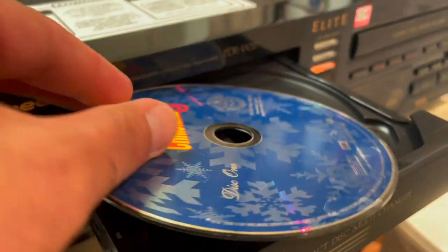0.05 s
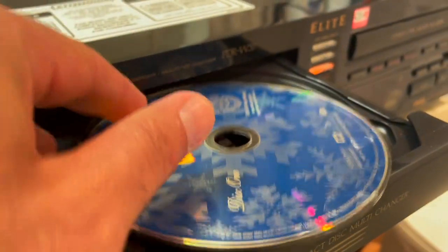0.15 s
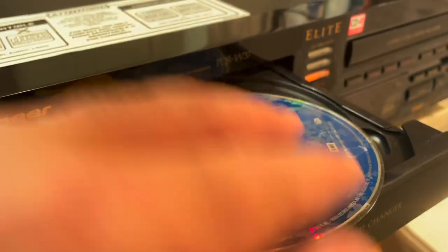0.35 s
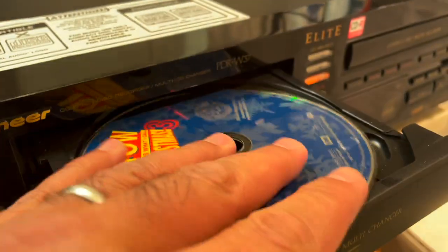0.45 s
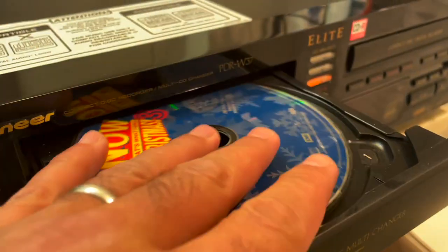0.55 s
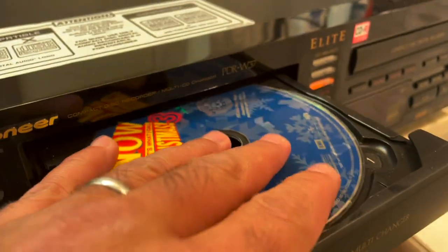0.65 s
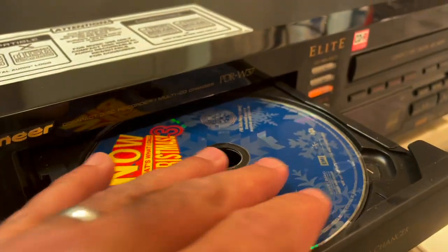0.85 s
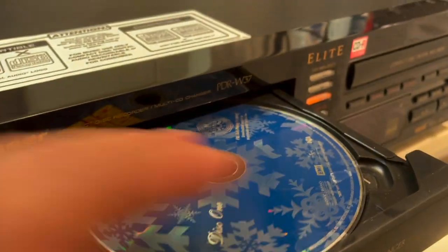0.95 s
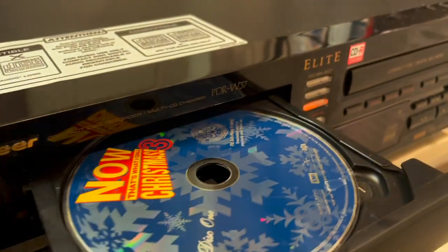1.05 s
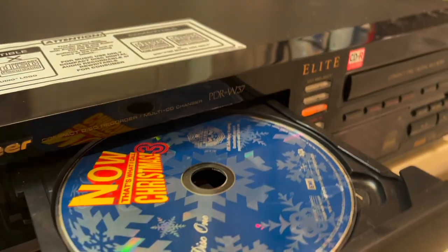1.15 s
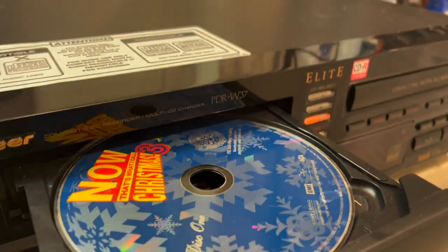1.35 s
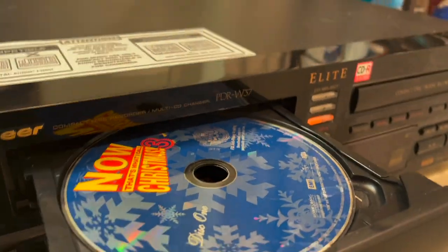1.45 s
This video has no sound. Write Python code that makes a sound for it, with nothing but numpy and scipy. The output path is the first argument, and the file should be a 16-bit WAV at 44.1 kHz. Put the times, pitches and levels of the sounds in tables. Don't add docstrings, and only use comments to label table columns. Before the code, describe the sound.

Hand seating a disc in an open plastic tray, close chattering clacks, then quiet low hum

```python
import sys
import numpy as np
from scipy import signal
from scipy.fft import rfft, irfft, next_fast_len
from scipy.io import wavfile
from scipy.ndimage import uniform_filter1d, map_coordinates

SR = 44100
rng = np.random.default_rng(int(sys.argv[2]) if len(sys.argv) > 2 else 0)


def output_pcm(signal):
    pcm = np.clip(np.atleast_2d(signal).T, -1, 1) * 32767
    wavfile.write(sys.argv[1], SR, np.round(pcm).astype(np.int16))


def gain_from_db(level_db):
    decades = np.asarray(level_db, float) / 20
    return 10 ** decades


N = 66150


def unit(x):
    return x / np.sqrt(np.mean(x ** 2) + 1e-20)


def along(points, hz):
    f, v = np.transpose(points)
    return np.interp(np.log(hz + 1), np.log(f + 1), v)


def wobble(rate):
    knots = rng.standard_normal(int(N * rate / SR) + 4)
    return map_coordinates(knots, [np.arange(N) * rate / SR])


def filtered(x, response):
    m = next_fast_len(N + SR // 2)
    return irfft(rfft(x, m) * response(np.fft.rfftfreq(m, 1 / SR)), m)[..., :N]


def body(colour, modes, wider, modes_db):
    def response(f):
        r = 1
        for centre, width, db in modes:
            damping = 1j * f * width * wider
            r = r + gain_from_db(db + modes_db) * damping / (centre * centre - f * f + damping)
        r = r * gain_from_db(along(colour, f))
        return r / np.sqrt(np.mean(np.abs(r) ** 2))
    return response


def contact_force():
    # t/s, peak/dB, tray ring/dB, edge sheen/dB, length/s
    rattles = [(0.2046, -22, -3, -12.5, 0.0083), (0.2548, -21, -1.5, -10.5, 0.011),
               (0.299, -22, -5.5, -10.5, .007), (0.443, -29, -1, -16.5, 0.0031),
               (0.478, -30, -1, -17, .005), (0.544, -22.5, -17, -5, 0.0052),
               (0.567, -21.5, -10.5, -9.5, 0.0079), (0.5877, -20, -8.5, -17, 0.0044),
               (0.597, -24.5, -5, -13, .011), (0.664, -22.5, -8, -12.5, 0.013),
               (0.757, -21.5, -4, -9, 0.0048)]
    # t/s, peak/dB, tray ring/dB, edge sheen/dB
    touches = [(0.033, -38.5, -5.5, -13), (0.0512, -34, -3, -14.5), (0.0917, -38, -2.5, -15.5),
               (.1095, -48.5, -5.5, -14.5), (0.1296, -45, -9.5, -16.5), (.1685, -47, -6.5, -9),
               (.177, -41.5, -2, -18.5), (0.223, -37.5, 6, -18.5), (0.2352, -33.5, 0, -5),
               (.293, -35.5, -3, -9.5), (0.332, -36, -0.5, -7), (0.377, -35.5, -3, -14.5),
               (0.402, -38.5, -3.5, -21), (.436, -40.5, -0.5, -18), (0.4692, -31.5, -3, -1.5),
               (0.5066, -30, -10.5, -10), (0.5241, -30, -12, -7), (0.618, -37, -9, -13),
               (0.652, -36, 4, -25), (0.686, -35, -5, -25.5), (.726, -53.5, -6, -10.5)]
    settling = [
        (1.4692, -65, 3, -19),
    ]
    # t/s, pressure/dB
    rubbing = [(0, -60.5), (.045, -54.5), (.08, -71.5), (.14, -56.5), (.195, -64), (.21, -49.5),
               (.32, -42.5), (.425, -64.5), (.465, -64.5), (.56, -42.5), (.61, -37.5), (.64, -53),
               (.72, -56), (.74, -50), (.8, -57.5), (.86, -68), (.915, -75), (.93, -100)]
    attack_s, release_s, touch_release_s = 0.0012, 0.0044, 0.0035
    crack_db, ring_db, sheen_db = -10, -6, -2
    lift_off_s = 0.755

    rows = [(*row, attack_s, release_s) for row in rattles]
    for s, db, ring, sheen in [*touches, *settling]:
        rows.append((s, db + 4, ring, sheen, 0, attack_s / 4, touch_release_s))
    u = np.arange(SR // 8) / SR
    slow = np.array([[1], [3.37], [1]])
    power = np.zeros((3, N + SR))
    for s, db, ring, sheen, length, attack, release in rows:
        shape = 1 - np.exp(-u / (attack * slow))
        shape = shape * np.exp(-np.clip(u - length, 0, None) / (release * slow))
        level = gain_from_db([[db + crack_db], [db + ring + ring_db], [db + sheen + sheen_db]])
        power[:, round((s - attack) * SR):][:, :len(u)] += (shape * level) ** 2

    t = np.arange(N) / SR
    patchy_db = 4 * wobble(59.96) * (t < lift_off_s)
    pressure_db = np.interp(t, *np.transpose(rubbing)) + patchy_db
    rub_gain = gain_from_db(pressure_db + np.array([[0], [3], [-15.5]]))
    return np.sqrt(power[:, :N] + rub_gain ** 2)


def disc_on_tray():
    # f/Hz, width/Hz, level/dB
    disc_modes = [(2500, 68, -1.5), (3068, 80, -1), (3480, 49, -1), (4330, 210, -5.5), (4680, 23, 0),
                  (5300, 83, -7), (5940, 75, -1.5)]
    tray_low_modes = [(620, 19, 0.5), (772, 37, -13.5), (901, 65, -13), (978, 23, -8)]
    tray_high_modes = [(1246, 51, -1.5), (1321, 70, -4.5), (1440, 31.9, -6), (1510, 8.6, 2), (1685, 35, -6),
                       (1972, 71, -7)]
    # f/Hz, level/dB
    crack_colour = [(500, -22.5), (1500, -13), (3000, 0.5), (5500, -4.5), (7000, -7), (9000, -30)]
    sheen_colour = [(5500, -25), (6600, 2.5), (10000, -1), (12500, -6), (13300, -14.5), (15700, -9)]
    low_colour = [(100, -9), (300, -0.5), (600, -3.5), (900, 0), (1150, 1.5), (1600, -35.5)]
    high_colour = [(600, -25), (1000, -14), (1300, -1), (2000, -4.5), (3500, -25.5)]
    # t/s, share of the high tone 0-1
    grip = [
        (0, 0.74),
        (.2, 0.55),
        (.3, 0.67),
        (.4, 0.7),
        (.5, 0.4),
        (.58, 0.65),
        (.67, .35),
        (.72, 0.52),
        (.752, 0.86),
    ]
    tray_wider, disc_wider = 0.92, 3.1
    snaps_per_s = 2000

    crack, ring, sheen = contact_force()
    high = np.clip(np.interp(np.arange(N) / SR, *np.transpose(grip)), 0, 1)
    dust = rng.standard_normal((2, N))
    snaps_db = 9.5 * (rng.random(N) < snaps_per_s / SR)
    grit = unit(dust * gain_from_db(2 * unit(wobble(1400)) + snaps_db))
    disc = filtered(grit * crack, body(crack_colour, disc_modes, disc_wider, 1))
    edge = filtered(grit * sheen, body(sheen_colour, [], 1, 0))
    tray_low = filtered(dust * ring * np.sqrt(1 - high), body(low_colour, tray_low_modes, tray_wider, 10))
    tray_high = filtered(dust * ring * np.sqrt(high), body(high_colour, tray_high_modes, tray_wider, 10))
    return disc + edge + tray_low + tray_high


def knocks():
    # t/s, peak/dB, f/Hz
    impacts = [(.2068, -32, 3300), (.2118, -30, 1950), (.2175, -34.5, 1500), (.2252, -29.5, 1150),
               (.2566, -26, 3100), (0.2617, -18.5, 1230), (.2645, -22.5, 3000), (.2742, -27, 1250),
               (.3005, -31, 2520), (.3035, -30.5, 1230), (0.4445, -31, 1950), (.4455, -31.5, 3000),
               (.4795, -31, 5200), (.4835, -32.5, 1300), (.5455, -31.5, 4260), (.5495, -28.5, 5200),
               (.5703, -23, 3290), (.5735, -31, 1450), (.5895, -24.5, 3560), (.5925, -32.5, 1700),
               (.6035, -29, 1300), (.6085, -33, 2000), (.6495, -35.5, 1950), (.6668, -28.5, 4590),
               (.6695, -18, 5600), (.6725, -26.5, 6300), (.6745, -25.5, 5000), (0.6768, -27.5, 5720),
               (0.681, -32.5, 4400), (.6865, -32.5, 1700), (.7572, -20, 4890), (.7605, -27.5, 2350),
               (.7632, -20.5, 4700), (.7665, -37.5, 1450)]
    # frequency ratio, level/dB
    partners = [(.87, -7), (1.16, -6.5), (1.43, -13.5)]
    # t/s, peak/dB, f/Hz,
    # t60/s
    lingering = [(.1, -46.5, 622, 0.16), (.21, -40.5, 990, 0.086), (.258, -29, 1201, 0.11),
                 (.26, -33, 873, 0.11), (.301, -31.5, 1176, .09), (.36, -43.5, 1335, 0.28),
                 (.4, -48, 600, .15), (0.479, -36.5, 1294, .1), (.485, -43.5, 611, 0.1),
                 (0.511, -40.5, 952, .2), (0.572, -34, 950, .1), (.596, -37.5, 838, 0.069),
                 (.658, -42, 1266, 0.072), (.666, -37, 753, .08), (.67, -38.5, 995, .08),
                 (.759, -34, 1277, .12), (0.761, -45.5, 1542, 0.27), (.77, -43.5, 380, .2),
                 (.764, -49.5, 4735, 0.22), (.766, -52, 5010, 0.18)]
    fall_cycles, rise_cycles, rise_s = 29, 0.6, 0.003

    out, u = np.zeros(N), np.arange(SR // 4) / SR
    for s, db, hz in impacts:
        ring = 0
        for ratio, less_db in [(1, 0), *partners]:
            mode_hz = hz * ratio
            decay_db = 60 * u * mode_hz / fall_cycles
            ring = ring + gain_from_db(db + 2 + less_db - decay_db) * np.sin(2 * np.pi * mode_hz * u)
        out[round(s * SR):][:len(u)] += ring * (1 - np.exp(-u * hz / rise_cycles))
    for s, db, hz, t60 in lingering:
        ring = gain_from_db(db - 60 * u / t60) * np.sin(2 * np.pi * hz * u)
        out[round(s * SR):][:len(u)] += ring * (1 - np.exp(-u / rise_s))
    return out


def thumps():
    # t/s, peak/dB, f/Hz
    pushes = [
        (0.208, -33, 70),
        (0.259, -31, 110),
        (0.445, -32.5, 90),
        (0.577, -32.5, 82),
        (.67, -36, 70),
        (.72, -53.5, 73),
        (0.641, -42, 220),
        (.6, -29, 345),
        (0.72, -38, 320),
        (.51, -40.5, 62),
    ]
    fall_cycles, rise_s = 20, 0.0087
    t, out = np.arange(N) / SR, np.zeros(N)
    for s, db, hz in pushes:
        u = np.clip(t - s, 0, None)
        swell = gain_from_db(db - 60 * u * hz / fall_cycles) * (1 - np.exp(-u / rise_s))
        out += swell * np.sin(2 * np.pi * hz * u)
    return out


def room(x):
    # f/Hz, t60/s
    decay = [(300, 1), (1400, 0.11), (4000, 0.06), (10000, 0.28)]
    hz, t, z = signal.stft(rng.standard_normal((2, SR // 2)), SR, nperseg=256)
    fading = z * gain_from_db(-60 * t / along(decay, hz)[:, None])
    tail = signal.istft(fading, SR, nperseg=256)[1]
    delayed = np.pad(x, (200, 0))[None]
    return signal.fftconvolve(delayed, tail / np.linalg.norm(tail[0]), axes=1)[:, :N]


def mains():
    # f/Hz, level/dB
    tones = [(119.5, -59), (254, -60)]
    t, out = np.arange(N) / SR, 0
    for hz, db in tones:
        out = out + gain_from_db(db + 4 + 1.9 * wobble(8.58)) * np.sin(2 * np.pi * (hz * t + rng.random()))
    return out


def air():
    # f/Hz, level/dB
    air_colour = [(30, -32.5), (65, -1), (200, -12.5), (420, -13.5), (1000, -22.5), (1850, -31),
                  (2500, -38), (3300, -43.5), (12000, -70), (16000, -100)]
    # f/Hz, width/Hz, level/dB
    hum_bands = [(56.7, 20, -58), (129, 6.7, -68.5), (243.4, 3, -61.5), (410, 33, -65.5), (880, 40, -76.5),
                 (1360, 150, -79.5), (2310, 230, -77)]
    # f/Hz, correlation
    likeness = [(60, 0.9), (240, 0.85), (950, 0.44), (3770, 0.52), (15000, 0.01)]

    def mid_side(hz):
        level = gain_from_db(-48 - 22 + along(air_colour, hz))
        for centre, width, db in hum_bands:
            level = level + gain_from_db(db) / np.sqrt(width) / (1 + ((hz - centre) / width * 2) ** 2)
        turn = np.arccos(np.clip(along(likeness, hz), -1, 1)) / 2
        return level * np.sqrt(SR / 2) * [np.cos(turn), np.sin(turn)]

    mid, side = filtered(rng.standard_normal((2, N)), mid_side) * gain_from_db(0.81 * wobble(4.1))
    return np.array([mid + side, mid - side])


def top_band_spells(x):
    # from t/s, to t/s
    spells = [(.056, .112), (.2025, .207), (.2345, .2365), (.252, .345), (.362, .412), (.467, .472),
              (.478, .527), (.542, .578), (.613, .642), (.661, .698), (.754, .78)]
    # f/Hz, share
    top_band = [(13700, 0), (14100, 1)]
    t = np.arange(N) / SR
    opened = sum(1. * (t > a) * (t < b) for a, b in spells)
    opened = uniform_filter1d(opened, size=160)
    return x + (opened * gain_from_db(3.5) - 1) * filtered(x, lambda hz: along(top_band, hz))


def scene():
    # f/Hz, phase by which left leads/rad
    port_lead = [(500, .3), (1300, 1), (2200, 0), (3100, .9), (5100, 0), (7300, -np.pi),
                 (11100, -2 * np.pi), (12800, -7.6), (14500, -3 * np.pi), (15100, -9.6), (15700, -10.3)]
    # f/Hz, level/dB
    diffuse = [(300, -0.5), (3000, 3), (6500, -10), (14000, -21.5)]
    # f/Hz, left up and right down by level/dB
    left_db = [(60, 1), (380, .7), (900, 2.2), (4400, 1.6), (7300, 1.1), (9000, 0), (14000, .4)]
    centre, off = disc_on_tray()
    centre = centre + knocks()
    sides = np.array([[1], [-1]])
    near = filtered(centre, lambda hz: np.exp(.5j * along(port_lead, hz) * sides))
    scattered = gain_from_db(-10.5) * off * sides + gain_from_db(-7) * room(centre)
    scattered = filtered(scattered, lambda hz: gain_from_db(along(diffuse, hz)))
    heard = near + scattered + thumps() + air() + mains()
    return filtered(heard, lambda hz: gain_from_db(along(left_db, hz) * sides))


def roll_off(x):
    return signal.sosfilt(signal.butter(12, 16810, fs=SR, output="sos"), x)


def record(dry):
    # f/Hz, level/dB
    band_edge = [(15750, 0), (15950, -18), (16500, -28), (16700, -55)]
    mix = filtered(top_band_spells(dry), lambda hz: gain_from_db(along(band_edge, hz)))
    return roll_off(mix)


dry = scene()
out = record(dry)
output_pcm(out)
```